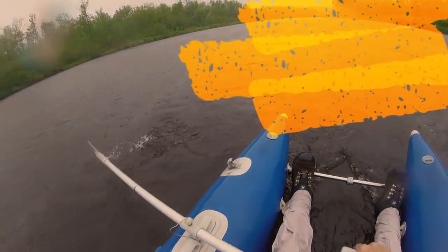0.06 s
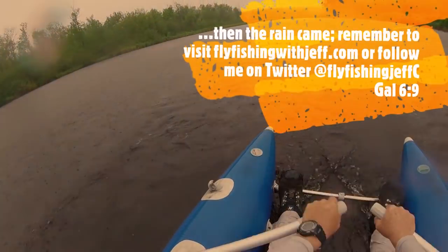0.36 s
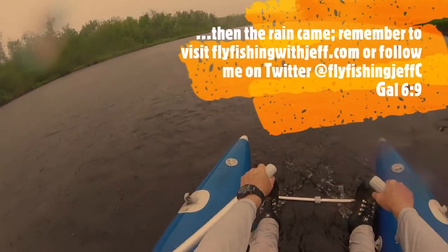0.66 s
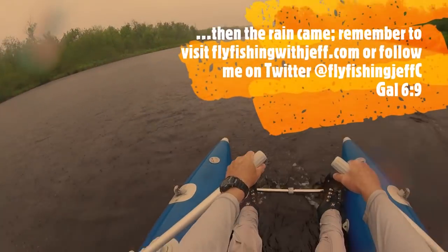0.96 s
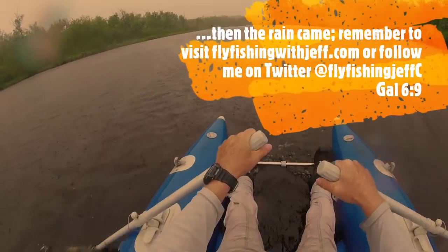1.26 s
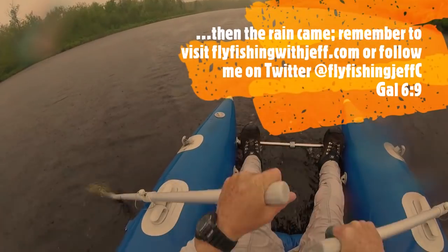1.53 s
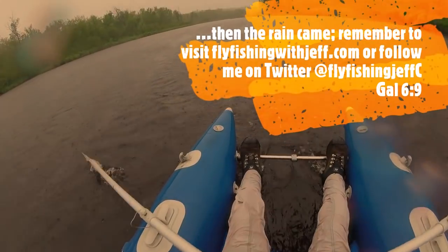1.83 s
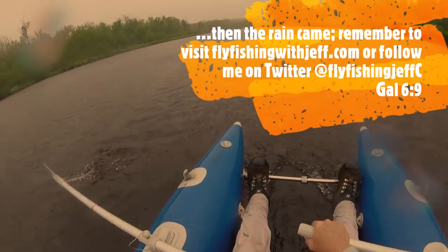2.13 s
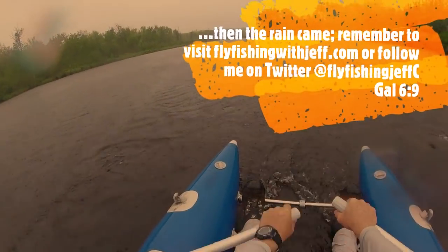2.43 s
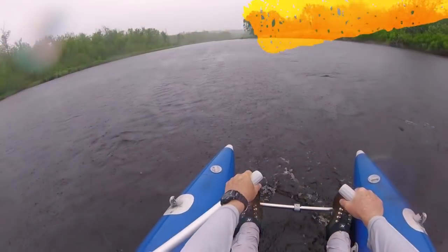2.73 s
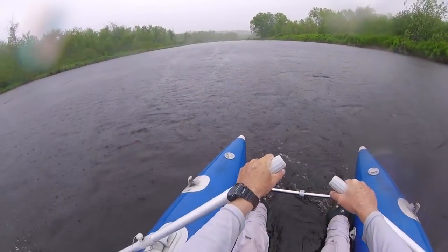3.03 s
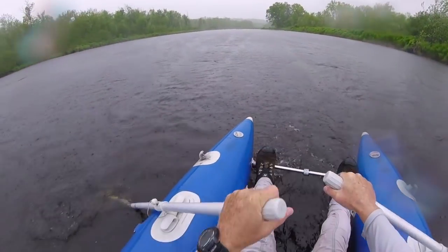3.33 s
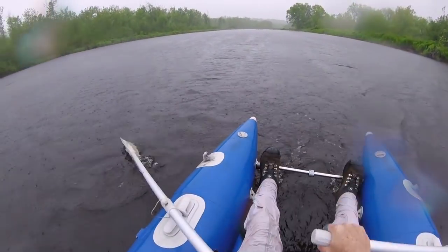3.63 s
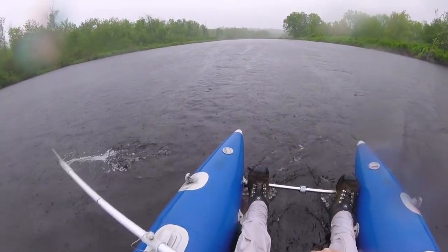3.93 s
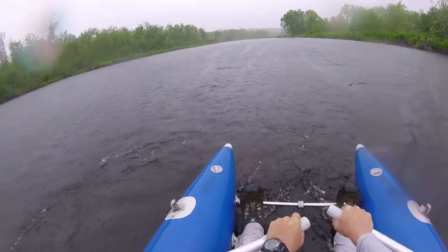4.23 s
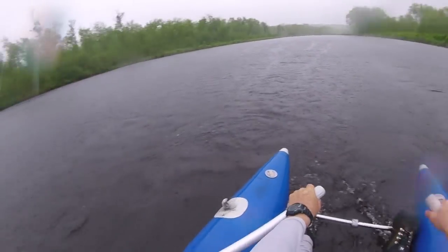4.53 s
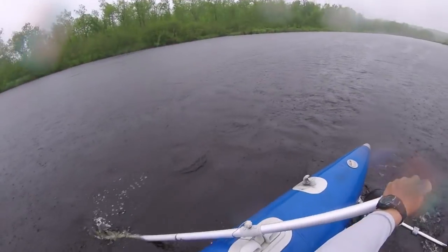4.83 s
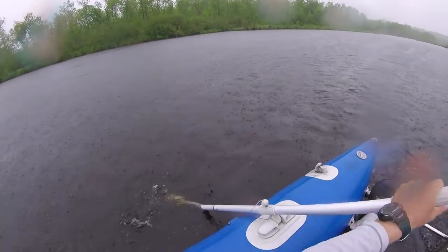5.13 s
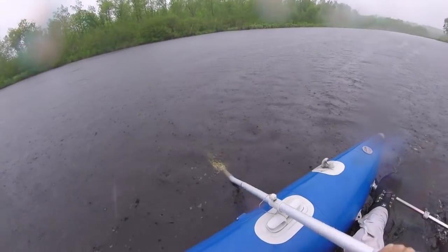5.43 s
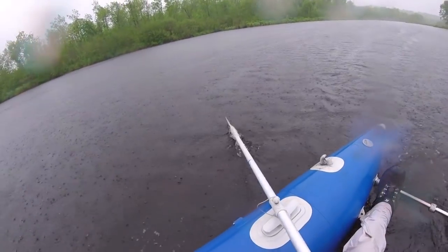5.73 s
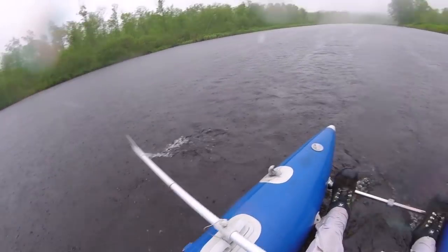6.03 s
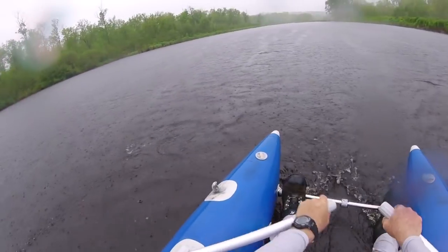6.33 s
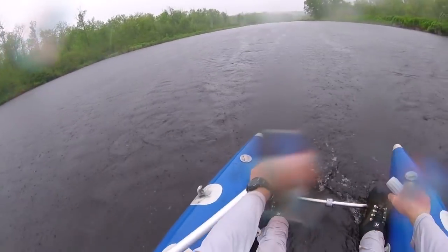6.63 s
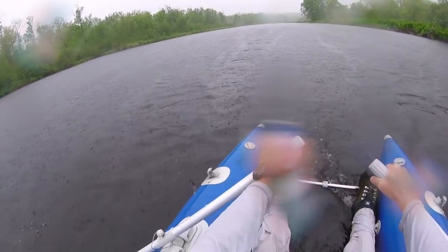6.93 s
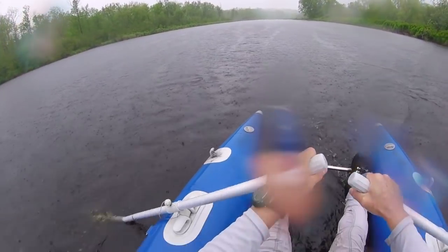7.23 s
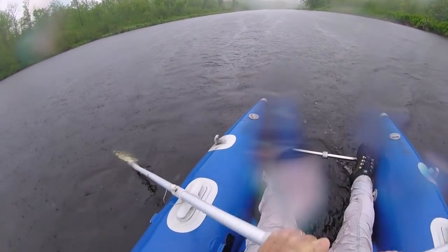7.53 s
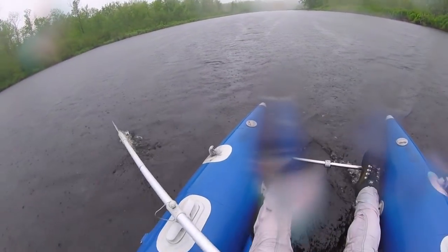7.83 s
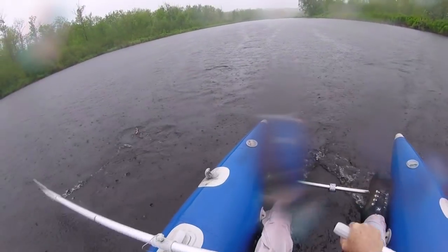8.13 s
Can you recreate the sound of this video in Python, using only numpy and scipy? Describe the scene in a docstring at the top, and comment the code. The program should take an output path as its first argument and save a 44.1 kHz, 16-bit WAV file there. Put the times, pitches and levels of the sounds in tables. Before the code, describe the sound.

Heavy rain patters and hisses on a river, heard from a small rowed pontoon boat. Big drops strike the microphone's housing with sharp, irregular ticks, and a few land as dull pops. About every two seconds the oars pull through the water with soft gurgles and small splashes. Low wind gusts grow through the second half. Near the end, the rain suddenly gets quieter around one loud pop, then creeps back.

```python
"""On a river in heavy rain, in a rowed pontoon boat, heard through a small wet microphone housing.
Countless drops patter on the water, near ones tick on the housing and a few pop right on its opening.
About every two seconds the oars pull, lift and shed water, and the hulls glide on; the bubbles they
trap ring and gurgle. A rising wind rumbles in gusts. Near the end the scene suddenly gets quieter."""
import sys
import numpy as np
from scipy import signal
from scipy.fft import rfft, irfft, next_fast_len
from scipy.io import wavfile

SR = 44100
rng = np.random.default_rng(int(sys.argv[2]) if len(sys.argv) > 2 else 0)


def output_pcm(signal):
    """Save a mono or channel-first signal as 16-bit PCM at the path in sys.argv[1].

    Samples are clipped to [-1, 1] before scaling.
    """
    pcm = np.clip(np.atleast_2d(signal).T, -1, 1) * 32767
    wavfile.write(sys.argv[1], SR, np.round(pcm).astype(np.int16))


N = 364707
TIME = np.arange(N) / SR

# Tone of the far rain, the near rain and the wind: frequency_hz, level_db
FAR_RAIN_TONE = [(200, 8), (600, 8.5), (1300, 0), (2500, -22.5), (4000, 1), (7000, -12), (10000, 2),
                 (13000, 4.5), (15000, -42)]
NEAR_RAIN_TONE = [(200, 2.5), (600, -8.5), (1300, 0), (2500, 3), (4000, 1), (7000, 2), (10000, 9),
                  (15000, -42)]
WIND_TONE = [(10, -12), (25, 0), (55, -1.5), (90, -7), (150, -16), (250, -39.5), (500, -47), (1500, -73)]
# How each water sound follows the rowing: rest_db, pull_db, shed_db, glide_db
PATTER_LEVELS = (-50.5, -48, -108.5, -50.5)
HISS_LEVELS = (-53.5, -55, -56.5, -51.5)
GURGLE_LEVELS = (-52.5, -53, -110, -64)
# Big drops that hit the housing: start_s, slap_db, slap_hz, crack_db, crack_hz
BIG_DROPS = [(0.2145, -42, 3290.0, -26, 4100.0), (0.9478, -17.5, 1370.0, -12.5, 7950),
             (1.2678, -27, 950.0, -20, 3920), (1.3629, -24, 1440.0, -32, 6600.0),
             (1.4073, -15, 940, -27, 5700), (1.5612, -17, 1545, -19.5, 8640),
             (1.6451, -31, 1500, -37, 5000), (1.6597, -18, 935, -24, 5500.0),
             (1.7101, -18, 970.0, -22, 6800.0), (1.7412, -24.5, 1600.0, -26, 4900.0),
             (1.9141, -34, 1800, -37, 5000), (2.0021, -29, 1730, -36, 4900.0),
             (2.0105, -23.5, 795, -23, 7000), (2.0416, -22, 1800, -30, 5200),
             (2.0811, -18, 1900, -34, 5000), (2.2184, -15.5, 1570, -28, 5950),
             (2.3848, -21.5, 1461, -38, 7900.0), (2.4681, -19.5, 1122, -29, 8000.0),
             (2.4788, -16, 1860, -43, 5300.0), (2.6504, -24, 940.0, -20, 7650),
             (2.7412, -28, 778, -31, 6200.0), (2.7844, -18.5, 2130.0, -38, 5600.0),
             (2.9313, -24, 2360.0, -19.5, 5250), (2.9737, -19, 1790, -39, 5000),
             (3.0455, -13.5, 800.0, -22, 4430), (3.6633, -20.5, 1400, -34, 5000),
             (4.0278, -35, 1280.0, -25, 6400.0), (4.4079, -22, 1454, -36, 6100.0),
             (4.5578, -22, 1210.0, -31, 5700.0), (4.6529, -22, 1570.0, -25.5, 5640),
             (4.8073, -19.5, 1350.0, -13, 8400), (5.0799, -20.5, 800, -31, 6000),
             (5.1257, -20, 900.0, -40, 7000.0), (5.3527, -16, 1280.0, -34, 6600.0),
             (5.3672, -13, 1150.0, -15.5, 7200), (5.5216, -22.5, 1700, -29, 5500),
             (5.6748, -20, 994, -36, 5900.0), (5.7008, -32, 1900, -22.5, 6200),
             (6.0048, -19, 890.0, -24, 4700.0), (6.032, -25, 1420.0, -20.5, 6800.0),
             (6.1754, -32, 2970.0, -23, 3730), (6.2399, -21, 2400, -29, 5500),
             (6.258, -25, 1215, -16, 8500.0), (6.2912, -22, 1700.0, -11.5, 8200.0),
             (6.2974, -10, 1070, -28, 5500.0), (6.3777, -20, 1598, -42, 4300.0),
             (6.463, -25, 1570.0, -36.0, 5340), (6.5466, -19.5, 1488, -18, 7300),
             (6.5543, -27, 780.0, -23, 7000.0), (6.5875, -20, 2220.0, -36, 7300.0),
             (6.6468, -19, 1970.0, -23, 5460), (6.9465, -14.5, 2380, -24, 7250),
             (6.9861, -25, 750, -14.5, 7700), (7.0095, -16.5, 1228, -24, 8400),
             (7.0814, -19, 2150.0, -23, 7050), (7.1001, -25, 1310.0, -31, 6200.0),
             (7.127, -17.5, 2590.0, -24, 6200.0), (7.2255, -20.5, 890, -40, 7100.0),
             (7.4665, -22, 1900, -32, 5000), (7.5687, -19, 1940, -28, 4180),
             (7.5875, -15, 510, -25, 6900.0), (7.6119, -18.5, 1900, -42, 4000),
             (7.6186, -24, 2450.0, -31, 5930), (7.6535, -15, 1400, -20, 7550),
             (7.7842, -14, 1300.0, -12, 6200), (7.8304, -37, 1200, -44.5, 7500)]
# Drops and puffs of air on the opening: start_s, level_db, push_s, softness, lean, leak_hz, knock_db
# (softness rounds the push's edges, a lean under 1 makes it peak early, knock_db adds to level_db)
OPENING_POPS = [(2.0101, -6, 0.002, 0.85, 1.9, 29, -50), (2.6569, 0.5, 0.0019, 2.2, 0.66, 146, -56),
                (3.046, -19.5, 0.0027, 1, 0.62, 70, -58), (4.226, -16, 0.01, 2.1, 0.9, 25, -60),
                (4.732, -14.5, 0.02, 1.3, 0.78, 13, -60), (5.004, -21.5, 0.0039, 1.1, .72, 40, -55),
                (5.078, -13.5, 0.007, 2, 0.99, 17, -47), (5.1263, -24, 0.0036, 2.1, 0.94, 50, -46),
                (5.3679, -20, 0.0033, 1.7, 0.52, 74, -35), (6.849, -13, 0.0087, 3.3, 1.15, 28, -60),
                (7.784, 2, 0.0016, 0.57, 0.55, 77, -36)]
# Notes of the knocked case: pitch_hz, level_db, ring_s (a ring_s is the time to fade by 60 dB)
CASE_NOTES = [(780, 19, 0.011), (1030, 11, 0.013), (1400, 25.5, 0.0057), (1670, 17.5, 0.019),
              (2140, 2, 0.047), (2650, 15, 0.015), (3160, 7, 0.012), (3630, 10, 0.004), (4700, 6, 0.007),
              (5500, 0, 0.0067)]
# Oar strokes, from when the blades dip in: start_s, pull_s, pull_db, shed_db, glide_db
OAR_STROKES = [(-0.45, 0.57, -1.5, 3, -2), (1.518, 0.69, 2.5, 3, -1.5), (3.57, 0.43, -1, 4.5, 0),
               (5.346, 0.775, 0, 5, 0), (7.399, 0.74, 1, -21.5, -19.5)]
# Short ringing tones (deep plops, tiny pings and three faint early notes near 1 kHz):
# start_s, level_db, pitch_hz, ring_s
RINGING_TONES = [(0.142, -34.5, 1020, 0.12), (0.311, -36, 1030, 0.11), (0.606, -36.5, 1114, 0.078),
                 (0.622, -34, 405, 0.12), (0.651, -38, 1200, 0.098), (0.681, -40, 1070, 0.06),
                 (0.815, -26, 215, 0.036), (0.866, -39, 1160, 0.089), (0.883, -26, 1600, 0.0094),
                 (0.915, -31, 290, 0.048), (0.96, -33, 880, 0.05), (1.079, -29.5, 1420, 0.017),
                 (1.095, -36.5, 693, 0.11), (1.599, -26.5, 1310, 0.038), (1.61, -33.5, 5070, 0.016),
                 (1.822, -24, 5300, 0.0073), (2.149, -28, 1180, 0.06), (2.1593, -28, 5500, 0.006),
                 (2.5875, -21, 3450, 0.0091), (2.588, -16.5, 4400, 0.0072), (2.69, -23, 1300, 0.01),
                 (2.7487, -33, 4870, 0.007), (2.895, -33.5, 295, 0.16), (3.678, -34, 640, 0.059),
                 (3.698, -26, 1310, 0.051), (3.745, -37, 445, 0.054), (3.7825, -30.5, 4970, 0.0087),
                 (3.925, -37, 422, 0.081), (4.011, -32, 5130, 0.007), (4.057, -32, 6200, 0.005),
                 (4.345, -39, 476, 0.14), (4.417, -33.5, 714, 0.065), (4.5, -29, 5250, 0.0052),
                 (4.715, -35, 293, 0.2), (4.8055, -29, 4900, 0.011), (4.806, -15, 8340, 0.0083),
                 (4.83, -32, 252, 0.1), (4.922, -22.5, 373, 0.056), (5.127, -27.5, 1110, .03),
                 (5.2808, -28, 4860, 0.006), (5.321, -38, 445, 0.07), (5.463, -34.5, 505, 0.076),
                 (5.5, -23.5, 1210, 0.03), (5.738, -34, 524, 0.11), (6.2, -15.5, 1400, 0.01),
                 (6.276, -37, 5200, 0.006), (6.4533, -32, 4760, 0.006), (6.552, -28.5, 410, 0.059),
                 (6.843, -19.5, 149, 0.065), (7.555, -29, 5300, 0.0066)]
# Splashes around the blades and hulls: start_s, hold_s, level_db
BOAT_SPLASHES = [(0.87, 0.11, -45.5), (1.616, 0.13, -46), (2.683, .05, -49), (3.652, 0.052, -48),
                 (5.485, 0.054, -45.5), (7.55, 0.045, -52.5)]
# The breeze on the opening: time_s, level_db
BREEZE_LEVELS = [(0, -38.5), (1.9, -41), (2.5, -38), (3.8, -33.5), (4.5, -34.5), (5.3, -37), (5.9, -34.5),
                 (7.2, -29)]
# Short gusts of wind: start_s, length_s, level_db, swirl_hz
WIND_GUSTS = [(0.077, 0.24, -38.5, 63.3), (1.677, 0.08, -40, 59), (2.318, 0.04, -28, 80),
              (2.468, 0.091, -33.5, 54), (4.012, 0.035, -34, 74.5), (4.213, 0.086, -29, 70.6),
              (4.317, 0.094, -30, 48), (4.455, 0.099, -31.5, 61.5), (4.585, 0.057, -27, 55.6),
              (4.697, 0.05, -25, 56), (4.771, 0.12, -29.5, 76.6), (4.869, 0.065, -26, 75.6),
              (5.002, 0.088, -31, 57.5), (5.599, 0.18, -34, 58), (6.05, 0.17, -36, 53),
              (6.302, 0.075, -31.5, 84.5), (6.366, 0.034, -36, 47), (6.764, 0.06, -33, 52),
              (6.836, 0.076, -31.5, 66), (6.948, 0.025, -27, 49.4), (7.187, 0.04, -27, 45),
              (7.281, 0.04, -26.5, 62), (7.356, 0.089, -30, 49), (7.469, 0.11, -27.5, 47.6),
              (7.579, 0.069, -26.5, 57), (7.656, 0.077, -24, 64)]
# Pitches that the housing boosts or weakens: centre_hz, width_hz, gain_db
HOUSING_BANDS = [(4120, 81, -9.5), (4820, 290, 3), (5323, 1130, 10), (6110, 890, -4), (6490, 330, 11),
                 (9040, 3800, -7.5)]


def rain(stroke):
    """Far drops blur into hiss; near ones, from sky or oars, click, splat or trap a ringing bubble."""
    flicker, flurry = from_db(1.2 * drift(18)), from_db(1.2 * drift(9))
    far = rms_one(colour(rng.standard_normal(N), FAR_RAIN_TONE)) * flicker
    clicks = rms_one(impacts(per_s=1900, spread_db=1.5))
    splats = bubbles(per_s=4200, low_hz=537, high_hz=9100, cycles=13, spread_db=3)
    near = rms_one(colour(splats + from_db(-5) * clicks, NEAR_RAIN_TONE)) * flurry
    downpour = from_db(2.5) * far + from_db(5.5) * near
    lows = cut(downpour, 1830, "low", order=1)
    spray = bubbles(per_s=600, low_hz=4200, high_hz=9000, cycles=22, spread_db=2.9)
    plinks = bubbles(per_s=150, low_hz=800, high_hz=2400, cycles=26, spread_db=3, count=16)
    patter = lows + from_db(-4) * plinks
    hiss = downpour - lows + from_db(-15.5) * spray
    return stirred(PATTER_LEVELS, stroke) * patter + stirred(HISS_LEVELS, stroke) * hiss


def housing_ticks(drops, spatter_s=0.0035, shudder_s=0.0078):
    """A drop hits the housing: a dull slap, a low shudder and a sharp crack, pitched by where it lands."""
    out, t = np.zeros(N), TIME[:2048]
    for start_s, slap_db, slap_hz, crack_db, crack_hz in drops:
        spatter = 0.059 * rng.standard_normal(len(t)) * np.exp(-t / spatter_s)
        hit = (t == 0) + spatter
        slap = cut(hit, [slap_hz / 2.3, slap_hz * 1.8], "band", order=1)
        slap = cut(slap, 2.2 * slap_hz, "low", order=1)
        snap = 0.1 * cut(hit, 8500, "high")
        crack = cut(hit, [crack_hz / 1.35, crack_hz * 1.35], "band", order=1) + snap
        shudder_hz = 171 * rng.uniform(0.83, 1.27)
        shudder = np.sin(2 * np.pi * shudder_hz * t) * np.exp(-t / shudder_s)
        thud = peak_one(slap) + from_db(-13.5) * shudder
        add(out, start_s, from_db(slap_db) * thud - from_db(crack_db) * peak_one(crack))
    return out


def small_ticks(per_s=11):
    """Smaller drops hit the housing at random times and spots."""
    times = TIME[rng.random(N) < per_s / SR]
    slap, slap_spot, crack, crack_spot = rng.uniform(-1.1, 1, (len(times), 4)).T
    slap_db, slap_hz = -29.5 + 1.5 * slap, 1500 * 2.2 ** slap_spot
    crack_db, crack_hz = -37.5 + 1.5 * crack, 5800 * 0.74 ** crack_spot
    return housing_ticks(zip(times, slap_db, slap_hz, crack_db, crack_hz))


def pops():
    """Air is pushed into the opening, leaks away and swings back; a hard drop also knocks the case."""
    out, t = np.zeros(N), TIME[:4096]
    knock = sum((-1) ** k * from_db(level_db) * ring(t == 0, pitch_hz, ring_s)
                for k, (pitch_hz, level_db, ring_s) in enumerate(CASE_NOTES))
    for start_s, level_db, push_s, softness, lean, leak_hz, knock_db in OPENING_POPS:
        push = np.abs(np.sin(np.pi * (t / push_s) ** lean)) ** softness * (t < push_s)
        pressure = cut(cut(push, leak_hz, "high", order=1), leak_hz, "high", order=1)
        add(out, start_s, from_db(level_db) * (pressure + from_db(knock_db) * knock))
    return out


def rowing():
    """How strongly the oars pull, the blades shed water and the hulls glide, at every moment."""
    pull = shed = glide = 0
    for start_s, pull_s, pull_db, shed_db, glide_db in OAR_STROKES:
        lift_s = start_s + pull_s
        pull += from_db(pull_db) * swell(start_s, rise_s=0.08, hold_s=pull_s - 0.08, fade_s=0.21)
        shed += from_db(shed_db) * swell(lift_s - 0.45, rise_s=0.45, hold_s=0.18, fade_s=0.029)
        glide += from_db(glide_db) * swell(lift_s + 0.2, rise_s=0.041, hold_s=0.68, fade_s=0.22)
    return pull, shed, glide


def stirred(levels_db, stroke):
    """Volume of a water sound: its power at rest plus what each part of the stroke adds."""
    return np.sqrt(sum((from_db(db) * part) ** 2 for db, part in zip(levels_db, (1, *stroke))))


def gurgles(stroke):
    """Oars and hulls fold bunches of big bubbles into the water; the deepest slosh during the glide."""
    pull, shed, glide = stroke
    per_s = 100 * from_db(4.4 * drift(7))
    gurgle = bubbles(per_s, low_hz=264, high_hz=950, cycles=13, spread_db=1.5)
    slosh = bubbles(per_s=60, low_hz=132, high_hz=440, cycles=18, spread_db=4.5, count=12)
    return stirred(GURGLE_LEVELS, stroke) * gurgle + from_db(-51.5) * glide * slosh


def tones(rows, rise=0.205):
    """Short tones that ring and rise in pitch as they fade."""
    out, t = np.zeros(N), TIME[:8192]
    for start_s, level_db, pitch_hz, ring_s in rows:
        phase = 2 * np.pi * pitch_hz * t * (1 + rise * np.minimum(t / ring_s, 1))
        add(out, start_s, np.sin(phase) * from_db(level_db - 60 * t / ring_s))
    return out


def burbles(stroke, low_hz=407.6, high_hz=1612, cycles=78):
    """The pull and the glide leave single bubbles behind; bigger ones ring lower and longer."""
    pull, shed, glide = stroke
    per_s = 24 * (pull + glide)
    times = TIME[rng.random(N) < per_s / SR]
    loudness, smallness = rng.random((len(times), 2)).T
    level_db = -45 + 5 * loudness
    pitch_hz = low_hz * (high_hz / low_hz) ** smallness
    return tones(zip(times, level_db, pitch_hz, cycles / pitch_hz))  # pitch rises near the surface


def splashes(stroke):
    """A splash is a short swarm of bubbles; droplets off the blades trap tiny ones that ping high."""
    pull, shed, glide = stroke
    bursts = sum(from_db(level_db) * swell(start_s, rise_s=0.022, hold_s=hold_s, fade_s=0.014)
                 for start_s, hold_s, level_db in BOAT_SPLASHES)
    swarm = bubbles(per_s=260, low_hz=550, high_hz=2100, cycles=28, spread_db=2.5, count=16)
    droplets = bubbles(per_s=330, low_hz=4400, high_hz=5900, cycles=22, spread_db=3.2, count=8)
    return bursts * swarm + from_db(-56) * shed * droplets


def wind(rise_s=0.008, fade_s=0.014):
    """Swirling air rumbles on the opening: a rising breeze, and gusts that start and die quickly."""
    breeze_db = np.interp(TIME, *np.transpose(BREEZE_LEVELS))
    swirls = from_db(2.8 * drift(9))
    out = from_db(breeze_db) * rms_one(colour(rng.standard_normal(N), WIND_TONE) * swirls)
    t = TIME[:16384]
    for start_s, length_s, level_db, swirl_hz in WIND_GUSTS:
        shape = np.clip(t / rise_s, 0, 1) * np.exp(-np.maximum(t - length_s, 0) / fade_s)
        gust = shape * cut(rng.standard_normal(len(t)), [swirl_hz / 1.73, swirl_hz * 1.4], "band")
        add(out, start_s, from_db(level_db) * rms_one(gust) * np.sqrt(np.mean(shape ** 2)))
    return out


def housing(x):
    """Hollow spaces in the housing boost some high pitches and weaken others."""
    for centre_hz, width_hz, gain_db in HOUSING_BANDS:
        tuning = -2 * np.cos(2 * np.pi * centre_hz / SR)
        width, gain = np.pi * width_hz / SR, from_db(gain_db / 2)
        boost, damp = width * gain, width / gain
        x = signal.lfilter([1 + boost, tuning, 1 - boost], [1 + damp, tuning, 1 - damp], x)
    return x


def bubbles(per_s, low_hz, high_hz, cycles, spread_db, count=24):
    """Bubbles in `count` sizes, each ringing for a set number of cycles."""
    births, sizes = impacts(per_s, spread_db), rng.integers(0, count, N)
    pitches = np.geomspace(low_hz, high_hz, count)
    return rms_one(sum(ring(births * (sizes == k), hz, cycles / hz) * np.sqrt(hz)
                       for k, hz in enumerate(pitches)))


def impacts(per_s, spread_db):
    """Clicks at random moments: many small far ones, few big near ones."""
    nearness = np.minimum(rng.exponential(1, N), 4.5)
    return (rng.random(N) < per_s / SR) * from_db(spread_db * nearness) * rng.choice([-1, 1], N)


def ring(clicks, pitch_hz, ring_s):
    """Each click starts a pure tone that dies away."""
    decay, step = from_db(-60 / (ring_s * SR)), 2 * np.pi * pitch_hz / SR
    return signal.lfilter([0, np.sin(step)], [1, -2 * decay * np.cos(step), decay ** 2], clicks + 1e-18)


def swell(start_s, rise_s, hold_s, fade_s):
    """A volume curve: a straight rise, a hold at 1, then a fade."""
    age = TIME - start_s
    return np.clip(age / rise_s, 0, 1) * np.exp(-np.maximum(age - rise_s - hold_s, 0) / fade_s)


def drift(rate_hz):
    """A slow random wobble, typically about 1 in size."""
    memory = np.exp(-80 * np.pi * rate_hz / SR)
    noise = rng.standard_normal(N // 40 + 2002)
    slow = signal.lfilter([1], [1, -2 * memory, memory ** 2], noise)[2000:]
    return np.interp(np.arange(N) / 40, np.arange(len(slow)), rms_one(slow))


def colour(x, tone):
    """Shape x by a tone table so that nothing sounds early (a minimum-phase filter)."""
    hz, db = np.transpose(tone)
    size = next_fast_len(N + 8192)
    size += size % 2
    bins_hz = np.maximum(np.arange(size // 2 + 1) * SR / size, 1)
    gains = from_db(np.interp(np.log(bins_hz), np.log(hz), db))
    cepstrum = irfft(np.log(gains))
    cepstrum[1:size // 2] *= 2
    cepstrum[size // 2 + 1:] = 0
    return irfft(rfft(x, size) * np.exp(rfft(cepstrum)))[:N]


def cut(x, hz, kind, order=2):
    """Keep only the lows, the highs or a band."""
    sections = signal.butter(order, np.clip(hz, 10, .45 * SR), kind, fs=SR, output="sos")
    return signal.sosfilt(sections, x + 1e-18)


def add(out, start_s, sound):
    """Mix in a short sound."""
    i = int(round(start_s * SR))
    out[i:i + len(sound)] += sound[:N - i]


def from_db(db):
    """Turn decibels into a multiplier."""
    return 10 ** (np.asarray(db) / 20)


def rms_one(x):
    """Scale to an average strength (rms) of 1."""
    return x / np.sqrt(np.mean(x ** 2) + 1e-20)


def peak_one(x):
    """Scale to a peak of 1."""
    return x / np.max(np.abs(x))


def scene(dip_at_s=7.722, fall_s=0.023, recovery_db_per_s=14.5):
    """All is heard through the housing; late on, all but the big ticks and pops dips and creeps back."""
    since_dip = TIME - dip_at_s
    dip_db = np.clip(since_dip / fall_s, 0, 1) * (-18.5 + recovery_db_per_s * since_dip)
    stroke = rowing()
    water = rain(stroke) + gurgles(stroke) + splashes(stroke) + burbles(stroke)
    rumble = from_db(0.73 * dip_db) * wind()  # dips less than the water
    hits = housing_ticks(BIG_DROPS) + pops()
    around = from_db(dip_db) * (water + tones(RINGING_TONES) + small_ticks()) + rumble
    return housing(around + hits)[None]


def record(dry, edge_hz=9400, cutoff_hz=14200):
    """The loudest pop overloads the microphone, which lets only a little of the highest treble through."""
    clipped = np.clip(dry, -.72, .72)
    body = signal.sosfilt(signal.cheby1(10, .3, edge_hz, fs=SR, output="sos"), clipped)
    faint_top = from_db(-21) * cut(clipped, 9700, "high", order=4)
    return cut(body + faint_top, cutoff_hz, "low", order=12)


dry = scene()
out = record(dry)
output_pcm(out)
```